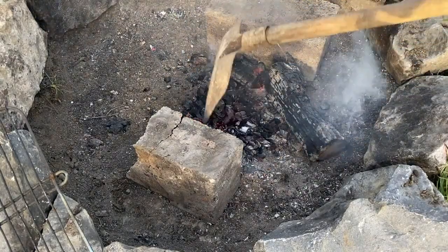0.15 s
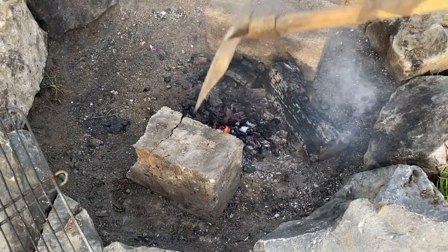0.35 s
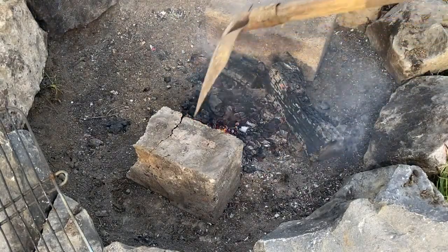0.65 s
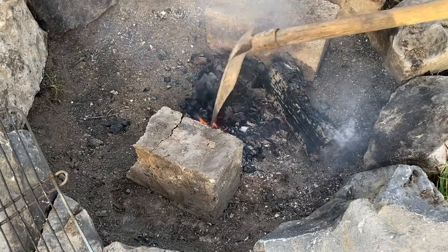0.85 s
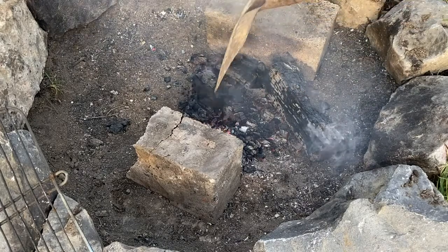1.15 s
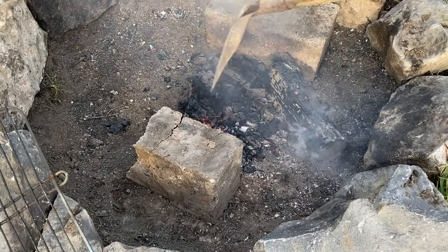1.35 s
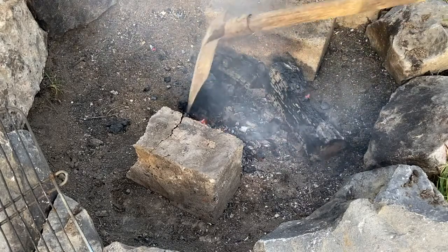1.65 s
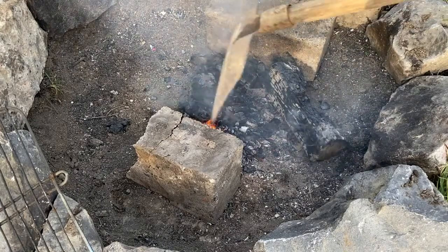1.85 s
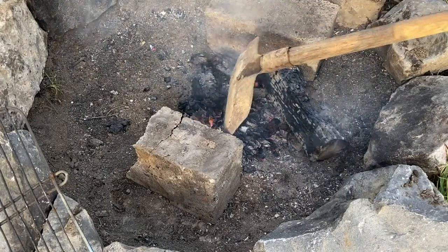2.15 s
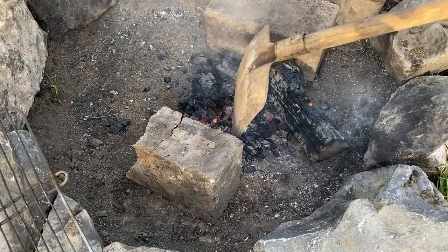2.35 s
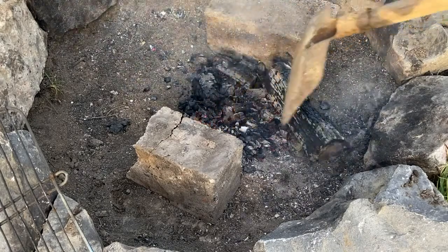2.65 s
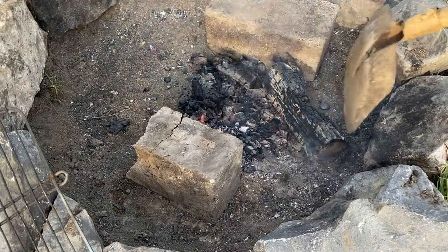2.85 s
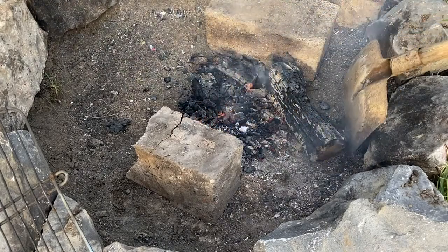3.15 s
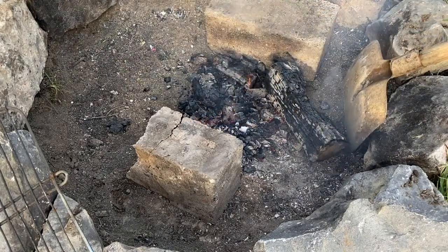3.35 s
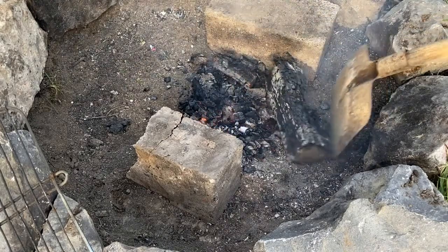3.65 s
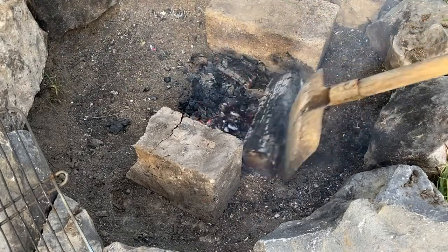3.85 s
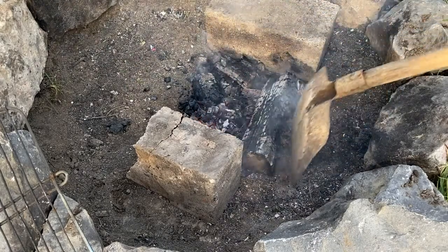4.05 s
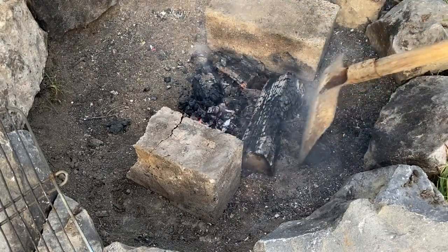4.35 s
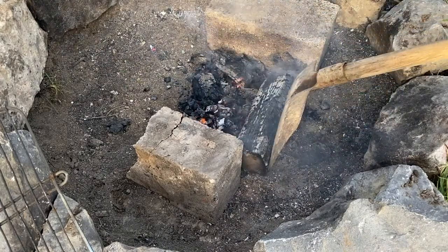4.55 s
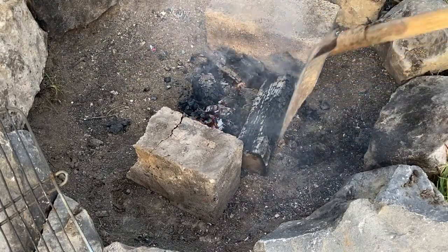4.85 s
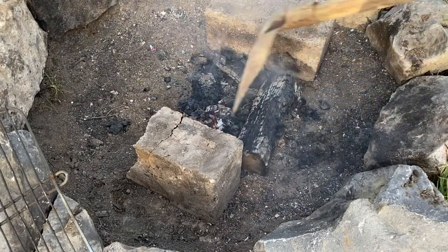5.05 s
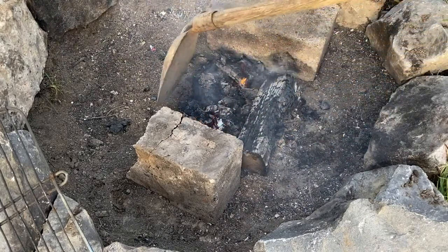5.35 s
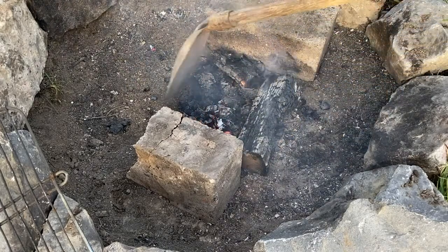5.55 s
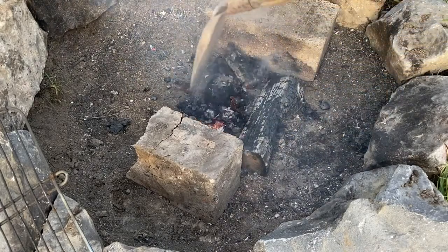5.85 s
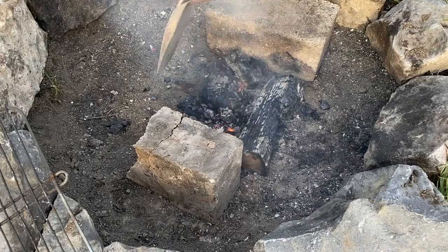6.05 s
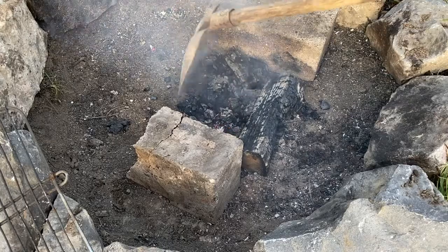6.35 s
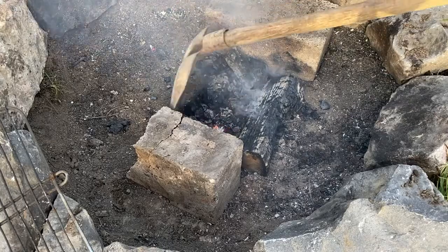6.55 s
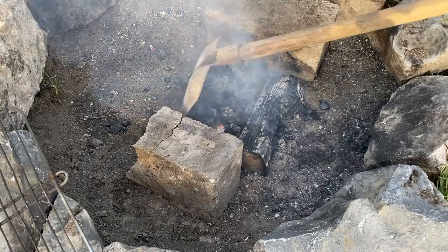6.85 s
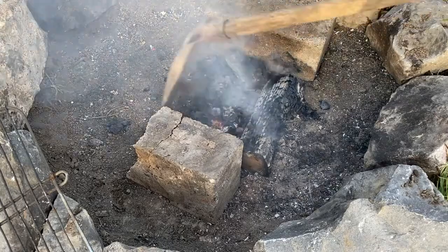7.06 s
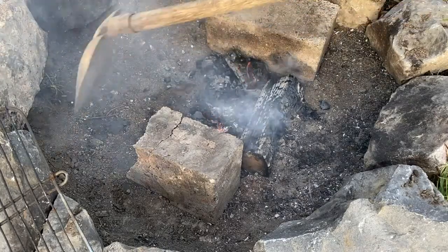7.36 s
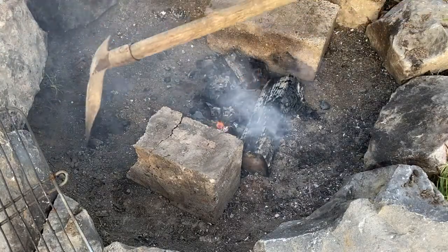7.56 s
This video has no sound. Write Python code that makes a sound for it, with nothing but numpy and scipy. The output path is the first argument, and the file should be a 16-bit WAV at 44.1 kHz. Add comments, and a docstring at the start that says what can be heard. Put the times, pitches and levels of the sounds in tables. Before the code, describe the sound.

A close, fairly dry outdoor perspective on a stone fire pit, with faint low air rumble and a soft hiss. At 0 s a shovel jab crunches charcoal with a dull thump and a short blade ring. More jabs follow at about 0.3, 0.6, 0.8, 1.5 and 2.0 s, brittle and crackly, with low log thuds and light wooden handle clacks. Embers pop, most sharply near 2.1 s. A quieter gap follows, with small crunches around 3.1 s. From 3.7 to 4.5 s a log is pushed: soft crunching, gritty rubbing, faint thin rings. After another lull, scraping resumes at 5.4 s, strongest near 5.6 s with a thump. At 6.15 s comes the loudest blow, a hard short knock with a metallic clang, then a heavy thud at 6.5 s and gritty dragging until about 7 s. Crackly jabs and a small ring end it at 7.4-7.7 s.

```python
"""A stone fire pit outdoors, where a steel shovel with a wooden handle works through embers and charred logs.
Charcoal crunches under its edge as clumps of tiny fractures; logs thump in a few low cycles and a shudder.
The handle clacks in its socket, and the blade rings in its modes when it meets the concrete block.
Between jabs the blade drags through ash, and the embers pop and tick over the rumble and hiss of quiet air."""
import sys
import numpy as np
from scipy import signal
from scipy.fft import irfft
from scipy.io import wavfile
from scipy.ndimage import uniform_filter1d

SR = 44100
rng = np.random.default_rng(int(sys.argv[2]) if len(sys.argv) > 2 else 0)


def bounce(signal):
    """Save signal as a 16-bit WAV file at the path given by the first command-line argument."""
    frames = np.transpose(np.atleast_2d(signal))
    limited = np.clip(frames, -1, 1)
    pcm = np.round(limited * 32767).astype(np.int16)
    wavfile.write(sys.argv[1], SR, pcm)


N = 340452
TIME_S = np.arange(N) / SR

# Modes of the blade. Each row: frequency in Hz, level in dB, t60 in seconds.
BLADE_MODES = [(910, 2, 0.17), (1100, -3.5, 0.35), (1290, 1.5, 0.4), (1382.7, 3.5, 0.29),
               (1422, -11.5, 0.98), (1740, -2, 0.8), (2024, -1.5, 0.64), (2128, -6, 0.23), (2290, 0, 0.51),
               (2457, -2, 0.41), (2685, -0.5, 0.35), (2960, 1, 0.61), (3026, -4, 0.25), (3160, -2.5, .22),
               (3200, -8, 0.086), (3360, -2, .28), (3560, 5, 0.28), (4150, -28, .28), (4046, 5, 0.08),
               (4100, -19.5, 0.2), (4420, 6.5, 0.36), (4306, -3.5, 0.71), (4700, 7, 0.081),
               (4850, -6, 0.51), (5060, 4, 0.33), (5570, 6, 0.37), (6089, -16, 0.15), (7060, 9, .25),
               (7160, -9, 0.59)]
# The whole blade flexing
BEND_HZ, BEND_T60_S = 406.4, 0.96
# Spectrum of the dull body of crushed charcoal. Each row: frequency in Hz, relative density in dB.
BODY_SPECTRUM = [(40, -82.5), (130, 8.5), (270, 7.5), (500, 5), (740, -2), (950, -1.5), (1450, 1.5),
                 (2400, -3.5), (4000, -4), (8000, -9.5), (16000, -20)]


def amp(db):
    """Amplitude ratio of a level in dB."""
    return 10 ** (np.asarray(db) / 20)


def unit(x):
    """Scales to an RMS of 1."""
    return x / np.sqrt(np.mean(x ** 2) + 1e-20)


def fade(t, t60_s):
    """Falls by 60 dB in t60_s."""
    return np.exp(-np.log(1000) * t / max(t60_s, 1e-3))


def add(mix, start_s, sound):
    """Adds a sound into the mix from start_s, cut at the end."""
    part = mix[max(round(start_s * SR), 0):][:len(sound)]
    part += sound[:len(part)]


def colour(x, spectrum, size=4096):
    """Minimum-phase filter of unit energy with the given spectrum, interpolated over log frequency."""
    points_hz, points_db = np.transpose(spectrum)
    bins_hz = abs(np.fft.fftfreq(size, 1 / SR)) + 1
    log_gain = np.log(amp(np.interp(np.log(bins_hz), np.log(points_hz), points_db)))
    response = np.exp(np.conj(signal.hilbert(log_gain)))
    taps = np.fft.ifft(response).real[:size // 2]
    return signal.fftconvolve(x, taps / np.linalg.norm(taps))[:len(x)]


def resonate(x, hz, width_hz):
    """One resonance, of gain about 1 at its centre."""
    r = np.exp(-np.pi * width_hz / SR)
    return 2 * signal.lfilter([1 - r], [1, -r * np.exp(2j * np.pi * hz / SR)], x).real


def grains(n, per_s, spread_db, clump_db):
    """Tiny fractures of uneven size that come in clumps a few milliseconds long."""
    size = amp(spread_db * np.minimum(rng.exponential(1, n), 4)) * rng.choice([-1, 1], n)
    occurs = rng.random(n) < per_s / SR
    clumps = unit(uniform_filter1d(rng.standard_normal(n), size=200))
    return unit(size * occurs * amp(clump_db * np.clip(clumps, -2, 2)))


def lump(x, t60_s, ring):
    """A lump of charcoal colours its cracks with a brief noisy ring, `ring` times the crack's amplitude."""
    t = TIME_S[:SR // 50]
    taps = rng.standard_normal(len(t)) * fade(t, t60_s)
    taps *= ring / np.linalg.norm(taps)
    taps[0] = 1
    return signal.fftconvolve(x, taps / np.linalg.norm(taps))[:len(x)]


def grit(n, size=3000):
    """A run of fractures, crossfading to a different lump under the edge every half window (34 ms)."""
    cracks = grains(n, per_s=8000, spread_db=2.5, clump_db=1.5)
    out, window = np.zeros(n), signal.get_window("hann", size)
    for start in range(0, n - size, size // 2):
        piece = cracks[start:start + size] * window
        add(out, start / SR, lump(piece, t60_s=.012, ring=.9))
    return unit(out)


def contact_db(hz, corner_hz=4540):
    """Drive of a blade mode by a crumbly charcoal contact, which feeds it less above the corner."""
    return -10 * np.log10(1 + (hz / corner_hz) ** 4)


def air(level_db=-63, split_hz=250, rumble_db=2.5, swell_db=-1.4):
    """Low outdoor rumble whose level wanders at random, under the faint steady hiss of the fire."""
    # Each row: frequency in Hz, relative density in dB.
    air_spectrum = [(15, -82), (25, -17), (105, -0.5), (200, -4), (416, -10.5), (489, -11.5), (695, -15),
                    (775, -16.5), (1260, -18), (2350, -22), (3520, -26), (5000, -26.5), (5880, -27.5),
                    (11000, -29), (16000, -32)]
    noise = amp(level_db) * unit(colour(rng.standard_normal(N), air_spectrum))
    low = signal.sosfiltfilt(signal.butter(2, split_hz, fs=SR, output="sos"), noise)
    swell_hz = np.geomspace(.3, 5, 16)
    swell = unit(sum(np.sin(2 * np.pi * (f * TIME_S + rng.random())) / np.sqrt(f) for f in swell_hz))
    return noise - low + low * amp(rumble_db + swell_db * swell)


def pit(x, near_db=-12, near_t60_s=0.086, yard_db=-29, yard_t60_s=.6):
    """The stones around the fire scatter a short echo; the yard adds a faint longer one."""
    t = TIME_S[:SR // 2]
    sparse = rng.random((2, len(t))) < 2500 / SR  # reflections per second
    taps = rng.standard_normal((2, len(t))) * sparse * (t > .003)
    near, yard = taps[0] * fade(t, near_t60_s), taps[1] * fade(t, yard_t60_s)
    echo = amp(near_db) * near / np.linalg.norm(near) + amp(yard_db) * yard / np.linalg.norm(yard)
    return x + signal.fftconvolve(x, echo)[:N]


def embers(tick_db=-80):
    """Single pops, each a snap with a brief ring, and a sprinkle of much smaller ticks."""
    # Embers popping. Each row: start in seconds, level in dB.
    pops = [(0.086, -25), (0.414, -28), (0.902, -30), (1.209, -28.5), (1.620, -27), (1.665, -35.5),
            (1.704, -32), (1.827, -38), (2.074, -17.5), (2.587, -26.5), (2.67, -35), (2.763, -39.5),
            (3.207, -35.5), (3.399, -37), (5.243, -37), (5.782, -38), (5.948, -38), (7.009, -31),
            (7.385, -31.5)]
    # Each row: frequency in Hz, relative density in dB.
    pop_spectrum = [(100, -65), (1000, 1), (2500, -6), (4500, 1), (8000, 5), (12000, 6), (16000, -6)]
    out = amp(tick_db) * lump(grains(N, per_s=60, spread_db=3, clump_db=1), t60_s=.008, ring=1.3)
    for start_s, db in pops:
        add(out, start_s, amp(db) * lump(signal.unit_impulse(SR // 50), t60_s=0.013, ring=1.3))
    return colour(out, pop_spectrum)


def clacks(half_width_ratio=1.275):
    """Wood knocks against the steel socket and chatters briefly, in one broad resonance."""
    # Handle knocks. Each row: start in seconds, level in dB, pitch in Hz, chatter t60 in seconds.
    knocks = [(0.083, -46.5, 1280, 0.026), (0.268, -47.5, 1070, 0.084), (0.374, -47.5, 1170, 0.036),
              (0.423, -52, 1170, .026), (0.775, -40, 1427, 0.016), (0.9, -55.5, 1720, 0.011),
              (1.510, -41.5, 1230, 0.035), (1.985, -36, 1110, 0.1), (4.41, -43, 1150, 0.065),
              (6.158, -25, 1180, 0.084), (7.473, -36, 1080, 0.015)]
    out, t = np.zeros(N), TIME_S[:SR // 4]
    for start_s, db, hz, t60_s in knocks:
        contact = signal.unit_impulse(len(t)) + .11 * rng.standard_normal(len(t)) * fade(t, t60_s)
        band_hz = [hz / half_width_ratio, hz * half_width_ratio]
        knock = signal.sosfilt(signal.butter(3, band_hz, "bandpass", fs=SR, output="sos"), contact)
        add(out, start_s, amp(db) * knock / np.std(knock[:SR // 150]))  # level over the first 7 ms
    return out


def thumps(low_cut_hz=85, detune_db_per_octave=4):
    """A few low cycles from the blow, then the pile shudders, most in the modes near the blow's pitch."""
    # Blows on logs and ground. Each row: start in seconds, level in dB, pitch in Hz, t60 in seconds.
    blows = [(0.000, -32, 118, .088), (0.086, -33, 293, 0.07), (0.273, -30, 256, 0.017),
             (0.337, -22, 270, 0.076), (0.345, -27, 113, 0.093), (0.58, -31, 270, 0.069),
             (0.778, -34.5, 290, 0.045), (1.448, -27, 271, 0.059), (1.513, -27, 302, 0.034),
             (1.984, -22.5, 245, 0.07), (2.034, -42.5, 357, 0.051), (3.741, -38.5, 270, 0.091),
             (4.419, -42, 248, 0.023), (5.492, -36.5, 361, .15), (5.567, -22, 372, 0.076),
             (5.628, -35, 297, 0.057), (5.746, -46, 261, 0.098), (6.156, -7, 346, 0.014),
             (6.528, -14.5, 278, 0.033), (6.888, -48, 246, 0.23)]
    # Modes of the log pile and handle. Each row: frequency in Hz, width in Hz, level in dB.
    pile_modes = [(125, 20, 2.5), (167.3, 11, -2), (265.5, 30.5, 10), (338, 190, 10.5), (375, 23, -25),
                  (517, 14, -5.5), (650, 14, -39), (925, 18, 0)]
    # A blow of blow_ref_db shudders at pile_ref_db, and less than in proportion for others
    blow_ref_db, pile_ref_db, pile_db_per_db = -29.5, -47, 0.66
    out, t = np.zeros(N), TIME_S[:SR // 2]
    for start_s, db, hz, t60_s in blows:
        blow = np.sin(2 * np.pi * hz * t) * fade(t, t60_s) * (1 - fade(t, 0.011))
        jolts = rng.standard_normal(len(t)) * fade(t, 0.14)
        pile = np.zeros(len(t))
        for mode_hz, width_hz, mode_db in pile_modes:
            shudder = unit(resonate(resonate(jolts, mode_hz, width_hz), mode_hz, 4 * width_hz))
            pile += amp(mode_db - detune_db_per_octave * abs(np.log2(mode_hz / hz))) * shudder
        pile_db = pile_ref_db + pile_db_per_db * (db - blow_ref_db)
        add(out, start_s, amp(db) * blow + amp(pile_db) * pile / np.std(pile[:SR // 25]))
    # the microphone's low cut thins the deep bass of the thumps
    return signal.sosfilt(signal.butter(2, low_cut_hz, "highpass", fs=SR, output="sos"), out)


def shimmer(t, db, rise_db_per_octave, count=220):
    """The blade's many weak, closely spaced modes, which die together and fast."""
    hz = rng.uniform(1100, 10000, count)
    lines = np.zeros(len(t) // 2 + 1, complex)
    phases = np.exp(2j * np.pi * rng.random(count))
    lines[(hz * len(t) / SR).astype(int)] = amp(rise_db_per_octave * np.log2(hz / hz.min())) * phases
    return amp(db) * unit(irfft(lines, len(t))) * fade(t, .17)


def strikes(scatter_db=1.5, detune_db_per_octave=0.5, lead_width_hz=100, twin_spread_hz=20, twin_db=-7,
            ash_db_per_s_khz=10, rise_s=.006, choke_t60_s=0.056):
    """The spot that is touched favours one mode; pressing the blade into the ash stops the ring."""
    # Blade set ringing. Each row: start in seconds, level in dB, leading mode in Hz, its lead in dB,
    # bending mode level in dB, free ringing time in seconds.
    hits = [(0.000, -48.5, 1370, 13, -54.5, 0.32), (0.579, -43.5, 3084, 24.5, -53, .4),
            (0.782, -57, 2660, 11.5, -60, .15), (1.512, -56, 4440, 6, -52.5, 0.14),
            (1.993, -44.5, 1390, 5, -64, 0.1), (3.736, -49.5, 2250, 0, -51, 0.053),
            (3.835, -50.5, 2460, 19, -71, 0.37), (4.187, -49, 2450, 18, -57, .3),
            (4.414, -48, 2430, 23, -72, 0.23), (5.359, -55, 2441, 14, -56, .1),
            (5.569, -60, 1380, 8, -53, 0.095), (5.618, -45.5, 1410, 17, -54, .04),
            (6.157, -32.5, 1366, 13.5, -36.5, .34), (6.223, -45.5, 2850, 8, -47, 0.26),
            (6.529, -42, 3030, 12, -32, 0.089), (7.666, -42, 1443, 14.5, -54, .2)]
    out, t = np.zeros(N), TIME_S[:SR]
    hz, mode_db, t60_s = np.transpose(BLADE_MODES)
    mode_db = mode_db + contact_db(hz)
    # ash on the blade damps the high modes sooner
    ash = amp(-ash_db_per_s_khz * hz[:, None] / 1000 * t)
    # the nearly symmetric blade has a weaker twin beside each mode, so the ring beats
    offset_hz = twin_spread_hz * rng.standard_normal((len(hz), 1))
    twins = amp(twin_db) * np.exp(2j * np.pi * (offset_hz * t + rng.random((len(hz), 1))))
    partials = np.array([np.exp(2j * np.pi * f * t) * fade(t, d) for f, d in zip(hz, t60_s)])
    modes = ash * (1 + twins) * partials
    bend = np.sin(2 * np.pi * BEND_HZ * t) * fade(t, BEND_T60_S)
    for start_s, db, lead_hz, lead_db, bend_db, free_s in hits:
        favour_db = lead_db * np.exp(-((hz - lead_hz) / lead_width_hz) ** 2)
        favour_db -= detune_db_per_octave * abs(np.log2(hz / lead_hz))
        weight = amp(mode_db + favour_db + scatter_db * rng.standard_normal(len(hz)))
        phase = np.exp(2j * np.pi * rng.random(len(hz)))
        ring = np.sqrt(2) * ((weight * phase) @ modes).real / np.linalg.norm(weight)
        blade = amp(db) * (ring + shimmer(t, db=-10, rise_db_per_octave=0.5)) + amp(bend_db) * bend
        choke = fade(np.maximum(t - free_s, 0), choke_t60_s)
        add(out, start_s, blade * (1 - fade(t, rise_s)) * choke)
    return out


def singing(scrape, ring_db=0, bend_db=-1, damping=1.48, bend_width_hz=20):
    """Scraping shakes the blade's modes, damped by what it touches."""
    ring = np.zeros(N)
    for hz, db, t60_s in BLADE_MODES:
        width_hz = damping * np.log(1000) / np.pi / t60_s
        ring += amp(db + contact_db(hz)) * resonate(scrape, hz, width_hz)
    return amp(ring_db) * ring + amp(bend_db) * resonate(scrape, BEND_HZ, bend_width_hz)


def drags(fizz_db=-0.5, body_db=-3.5, attack_share=0.29, t60_s=0.082, trickle_db=-15, trickle_t60_s=0.89):
    """Grit rolls and cracks under each push, then crumbs trickle back; the dull body also rubs the blade."""
    # Pushes through ash and grit. Each row: start in seconds, length in seconds, level in dB,
    # dullness in dB of body against fizz.
    pushes = [(0.04, 0.14, -68, 1.5), (0.382, 0.078, -68, 8.5), (1.526, 0.035, -61, 6),
              (2.125, 0.023, -62, 0), (2.471, 0.038, -68, 7), (3.489, 0.19, -60.5, 4.5),
              (3.814, 0.057, -55, 9), (4.279, 0.086, -68, 13), (4.46, 0.14, -64, -5),
              (5.421, 0.14, -58.5, 5.5), (5.581, 0.068, -42.5, 2), (5.822, 0.048, -60, -18),
              (6.345, 0.13, -54, 4.5), (6.573, 0.056, -43.5, -1.5), (6.703, 0.19, -53, 2.5),
              (6.78, 0.045, -50.5, 5.5)]
    # Spectrum of the fizz of ash. Each row: frequency in Hz, relative density in dB.
    ash_spectrum = [(100, -36), (800, -29), (2000, -35), (4000, -3), (6200, 2.5), (8500, 5), (11000, 5.5),
                    (13500, 1.5), (16000, -7.5)]
    # Blade modes that a steady rub sets singing. Each row: frequency in Hz, width in Hz, gain in dB.
    rubbed_modes = [(1409, 17.6, 5.5), (2430, 29, 7)]
    fizz_power, body_power = np.zeros(N), np.zeros(N)
    t = TIME_S[:SR]
    for start_s, length_s, db, dull_db in pushes:
        after_s = np.maximum(t - length_s, 0)
        release = np.maximum(fade(after_s, t60_s), amp(trickle_db) * fade(after_s, trickle_t60_s))
        force = amp(db) * np.minimum(t / (attack_share * length_s), 1) * release
        add(fizz_power, start_s, force ** 2)
        add(body_power, start_s, (force * amp(dull_db)) ** 2)
    body = amp(body_db) * colour(grit(N) * np.sqrt(body_power), BODY_SPECTRUM)
    fizz = amp(fizz_db) * colour(grit(N) * np.sqrt(fizz_power), ash_spectrum)
    rub = sum(amp(db) * resonate(body, hz, width_hz) for hz, width_hz, db in rubbed_modes)
    return fizz + body + rub


def crunches(body_db=-6, hollow_db=-10, hollow_q=4, edge_at_0_db_hz=18800, edge_fall_octaves_per_db=0.02):
    """Each jab crushes charcoal: fractures swell, then trickle away, with a hollow note of the lump."""
    # Charcoal breaking under the edge. Each row: start in seconds, level in dB, rise in seconds,
    # t60 in seconds, dullness in dB of body against fizz, hollow note in Hz.
    jabs = [(0.000, -36.5, 0.003, 0.033, .5, 1290), (0.028, -47.5, 0.0024, 0.13, 3.5, 1340),
            (0.263, -47.5, 0.0078, 0.049, 1.5, 1100), (0.335, -29.5, 0.0064, 0.044, 1, 3340),
            (0.370, -45, .003, 0.077, 5, 1280), (0.577, -38.5, 0.0026, 0.029, 8, 1030),
            (0.765, -32, 0.011, 0.11, 0, 1460), (0.793, -39.5, 0.0071, .16, -3, 3730),
            (1.447, -30.5, 0.0028, 0.099, -4.5, 2030), (1.958, -30.5, .002, 0.067, -14, 1980),
            (1.964, -31.5, 0.023, 0.12, 1.5, 950), (2.024, -35.5, .008, 0.17, -4, 3240),
            (3.073, -43.5, 0.018, 0.073, -2, 1640), (3.114, -46, 0.0022, 0.074, 2, 1750),
            (3.689, -36.5, 0.027, 0.056, 0.5, 2240), (3.735, -35.5, 0.0006, 0.11, 4.5, 2330),
            (3.801, -49.5, 0.002, 0.26, 3, 2400), (4.177, -56.5, 0.0034, 0.07, 12.5, 2080),
            (4.186, -36.5, 0.0053, 0.074, -2, 6040), (4.372, -45, .007, .15, 6.5, 1440),
            (4.403, -36.5, 0.0049, 0.19, 3, 2360), (5.344, -43.5, 0.024, .07, -0.5, 4900),
            (5.486, -45.5, 0.0017, 0.33, 6, 2390), (5.544, -38.5, .012, 0.14, 0, 3700),
            (6.155, -33.5, .004, 0.053, 14, 2400), (6.209, -49, 0.017, 0.15, 13, 2520),
            (6.526, -49, 0.0034, 0.062, 23.5, 3040), (7.437, -49.5, 0.0051, 0.24, 4.5, 1580),
            (7.457, -47, 0.0034, 0.054, 2, 1310), (7.566, -53, 0.011, 0.21, 7, 2060),
            (7.639, -41.5, 0.0018, 0.15, -2, 1960), (7.662, -37, .014, 0.028, 3, 2000)]
    # Spectrum of the bright cracks. Each row: frequency in Hz, relative density in dB.
    fizz_spectrum = [(100, -50), (800, -45), (2000, 3.5), (4000, -1.5), (6200, -0.5), (8500, 1.5),
                     (11000, 0), (13500, -5), (16000, -22)]
    out, t = np.zeros(N), TIME_S[:SR // 3]
    for start_s, db, rise_s, t60_s, dull_db, hz in jabs:
        rise = np.minimum(0.26 + 0.66 * t / max(rise_s, 1e-4), 1)
        force = rise * fade(np.maximum(t - rise_s, 0), t60_s)
        cracks, crumbs = (grains(len(t), per_s=9000, spread_db=2.6, clump_db=1.4) for _ in range(2))
        # a dull crunch is a softer contact, so its fizz ends lower
        edge_hz = min(edge_at_0_db_hz * 2 ** (-edge_fall_octaves_per_db * dull_db), SR / 2 - 10)
        fizz = colour(lump(cracks * force, t60_s=0.018, ring=1.0), fizz_spectrum)
        fizz = signal.lfilter(*signal.butter(2, edge_hz, fs=SR), fizz)
        body = colour(crumbs * force, BODY_SPECTRUM)
        hollow = force * unit(resonate(resonate(cracks, hz, hz / hollow_q), hz, hz / 2))
        dull = amp(body_db) * body + amp(hollow_db) * hollow
        add(out, start_s, amp(db) * (fizz + amp(dull_db) * dull))
    return out


def scene():
    """Everything that the shovel stirs and the embers, inside the pit, over the air."""
    scrape = crunches() + drags()
    shovel = scrape + singing(scrape) + thumps() + clacks() + strikes()
    return (pit(shovel + embers()) + air())[None]


def record(dry, edge_hz=16200):
    """The recorder's band limit: a steep linear-phase low-pass."""
    taps = signal.firwin(511, edge_hz, window=("kaiser", 9), fs=SR)
    return signal.oaconvolve(dry, taps[None], "same")


dry = scene()
out = record(dry)
bounce(out)
```